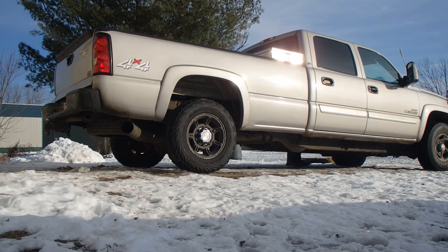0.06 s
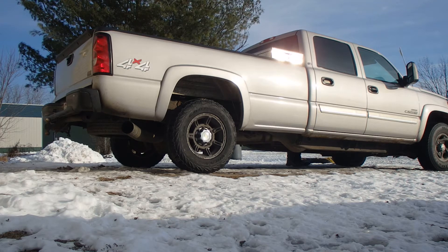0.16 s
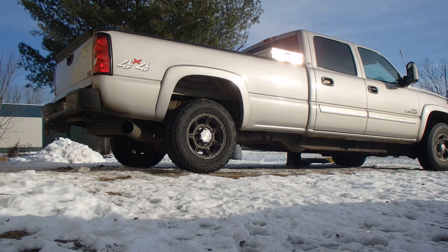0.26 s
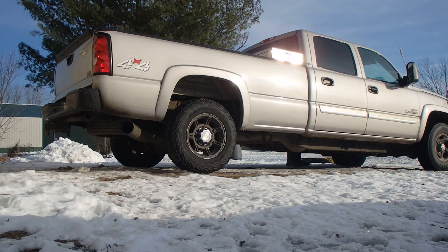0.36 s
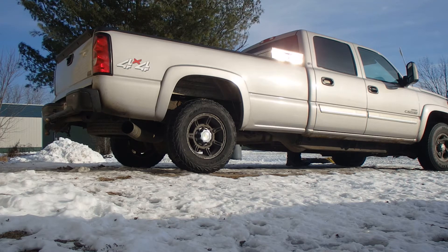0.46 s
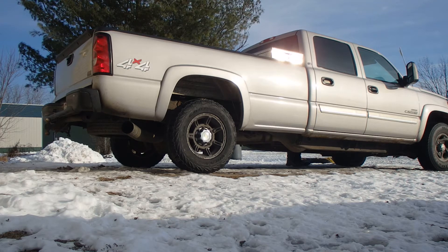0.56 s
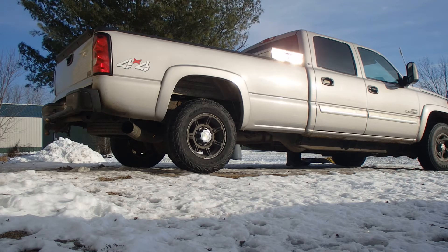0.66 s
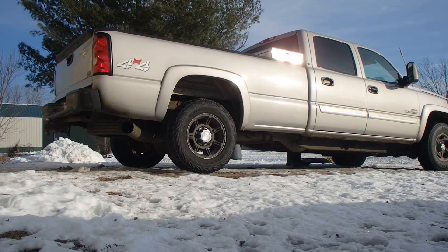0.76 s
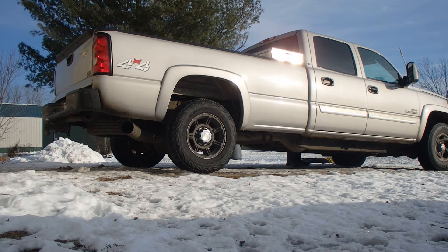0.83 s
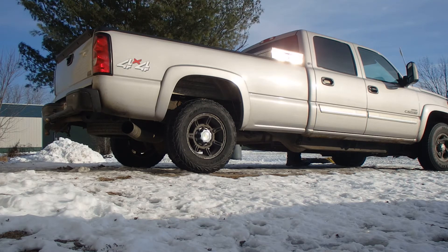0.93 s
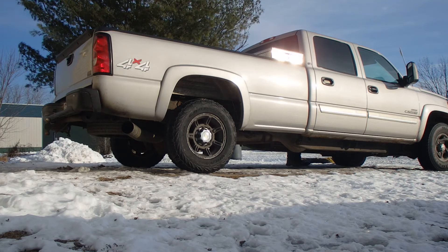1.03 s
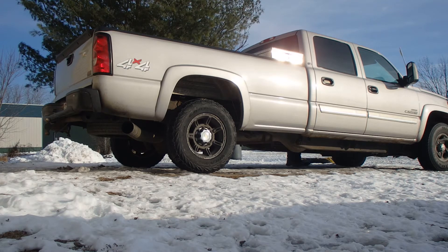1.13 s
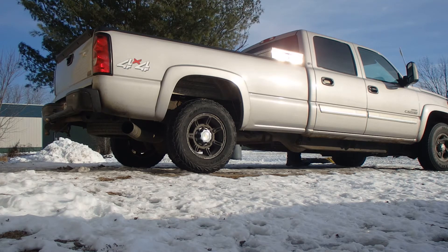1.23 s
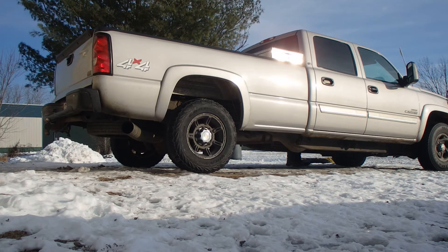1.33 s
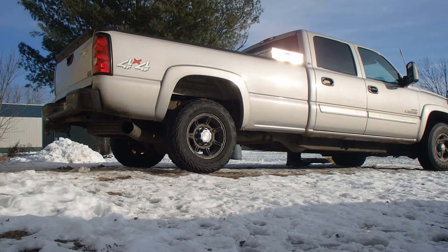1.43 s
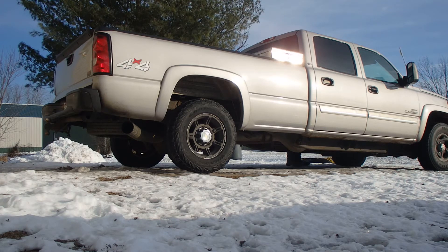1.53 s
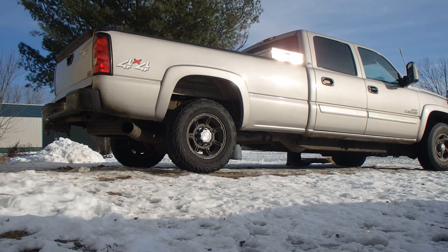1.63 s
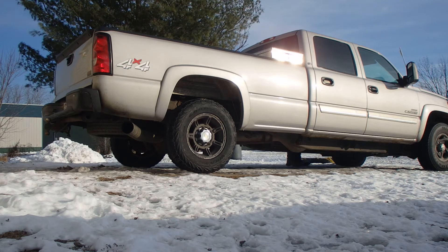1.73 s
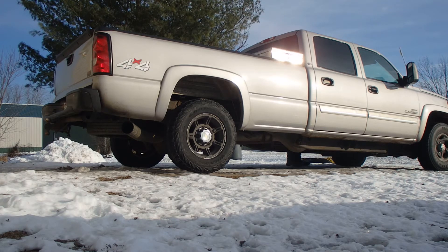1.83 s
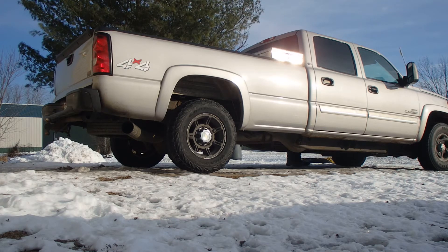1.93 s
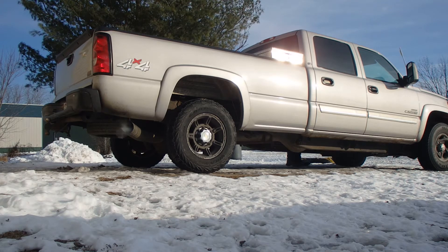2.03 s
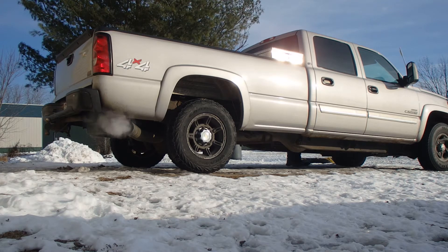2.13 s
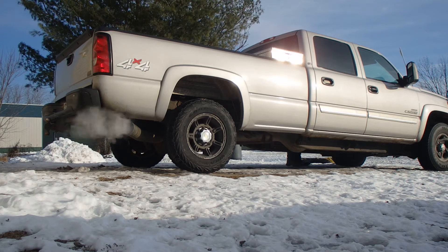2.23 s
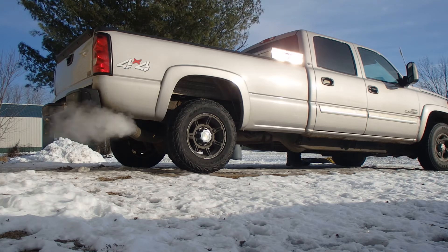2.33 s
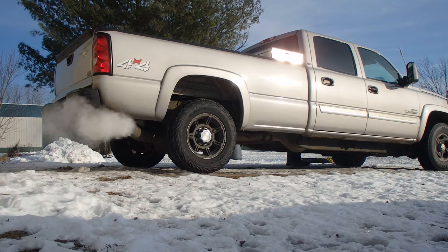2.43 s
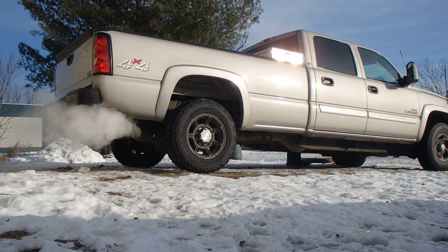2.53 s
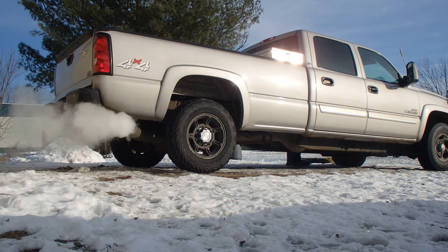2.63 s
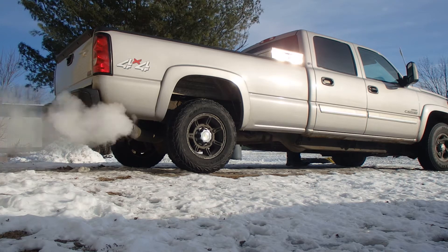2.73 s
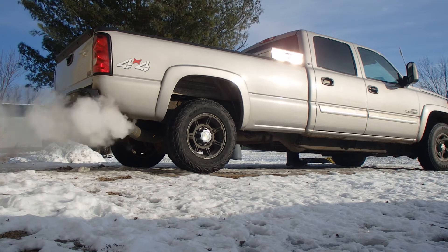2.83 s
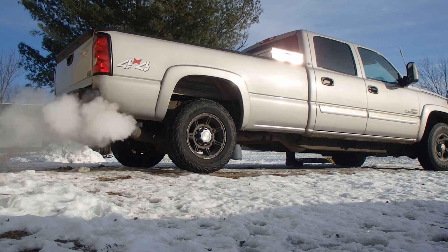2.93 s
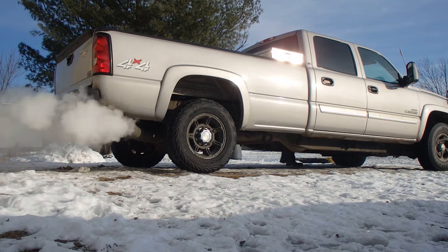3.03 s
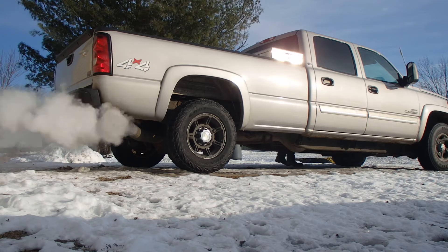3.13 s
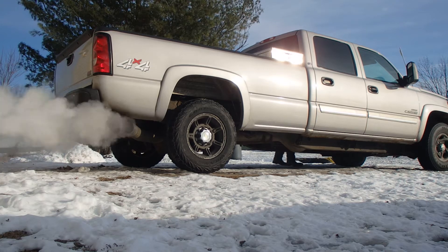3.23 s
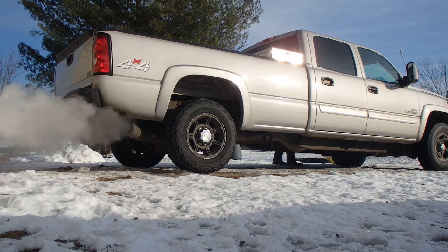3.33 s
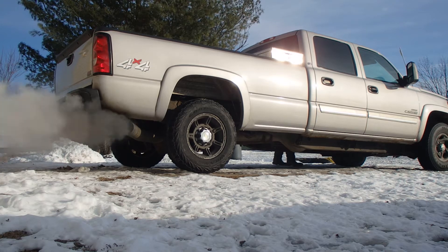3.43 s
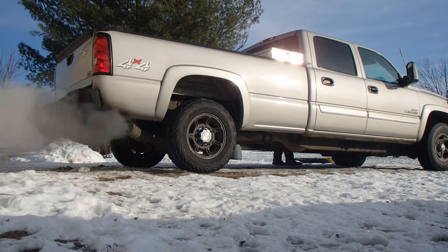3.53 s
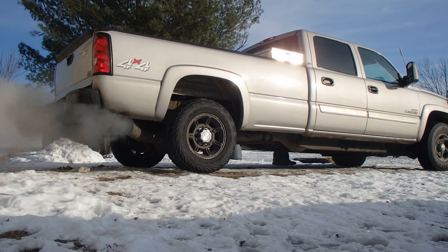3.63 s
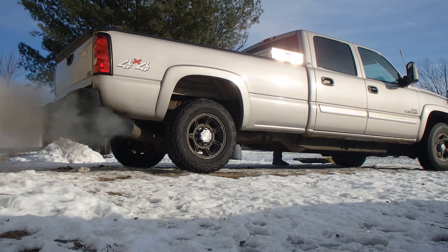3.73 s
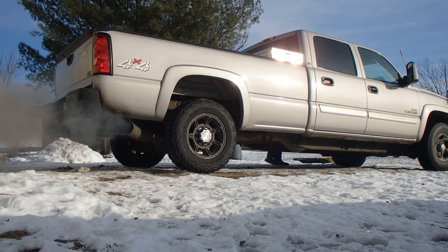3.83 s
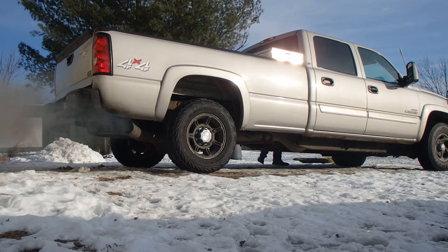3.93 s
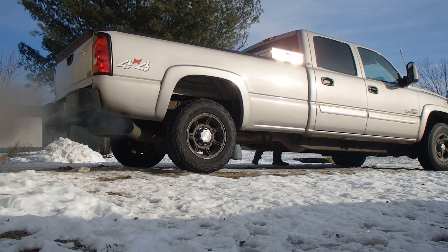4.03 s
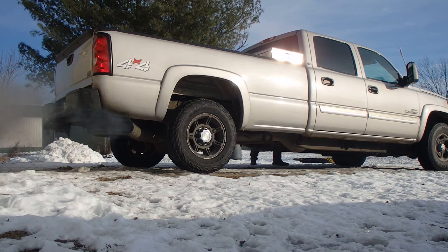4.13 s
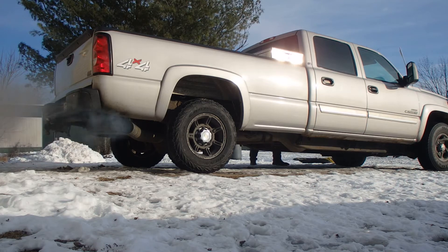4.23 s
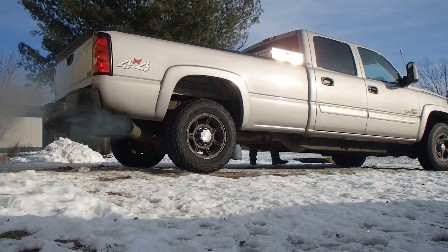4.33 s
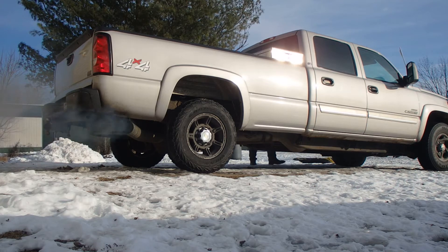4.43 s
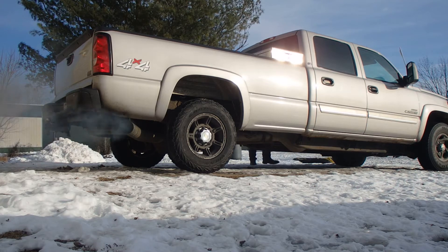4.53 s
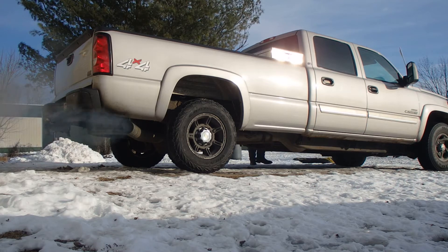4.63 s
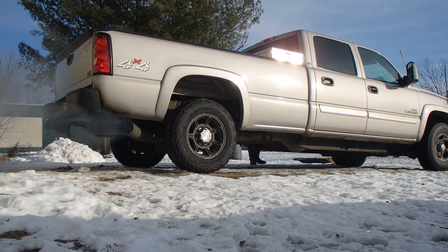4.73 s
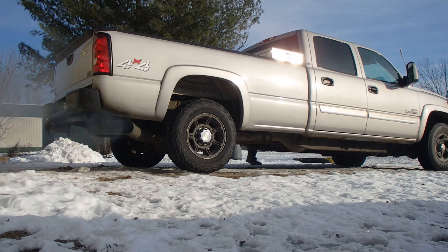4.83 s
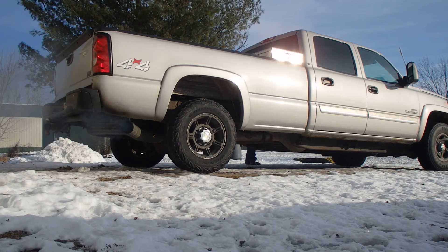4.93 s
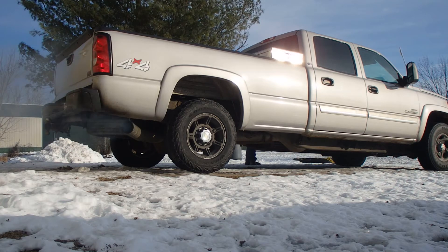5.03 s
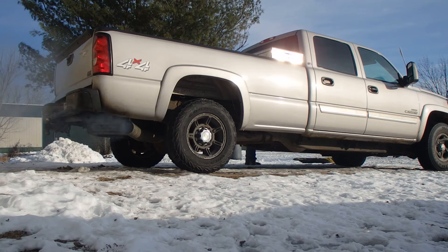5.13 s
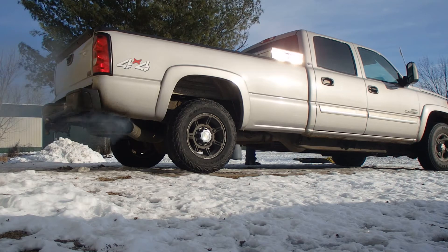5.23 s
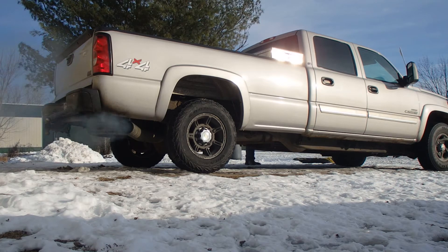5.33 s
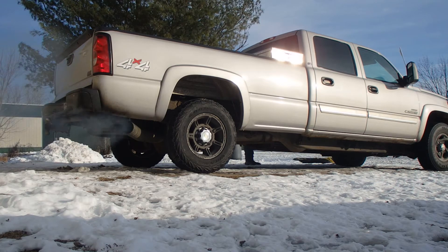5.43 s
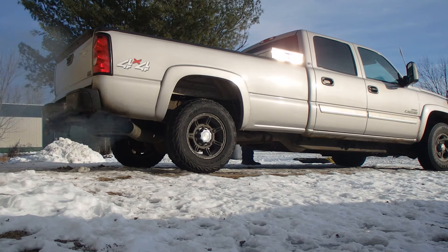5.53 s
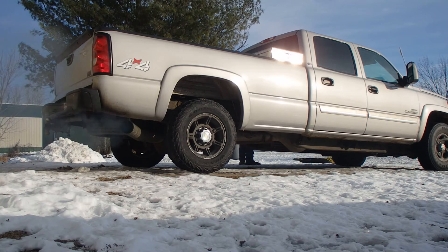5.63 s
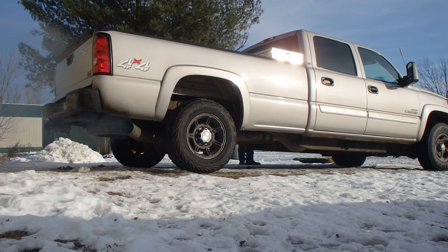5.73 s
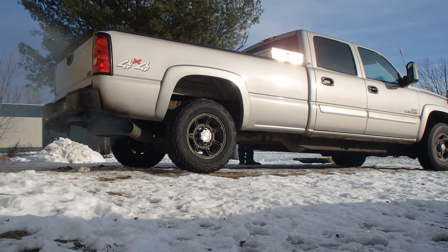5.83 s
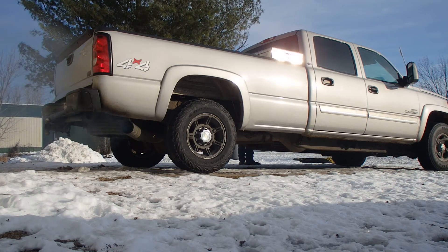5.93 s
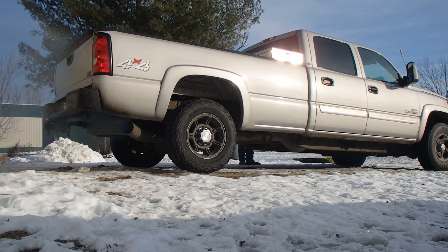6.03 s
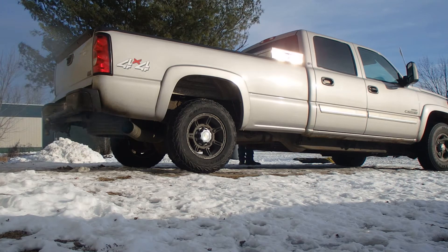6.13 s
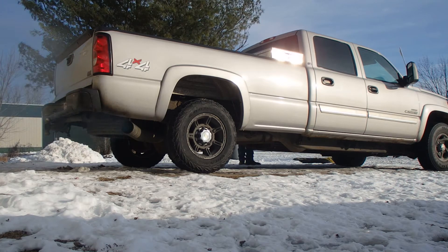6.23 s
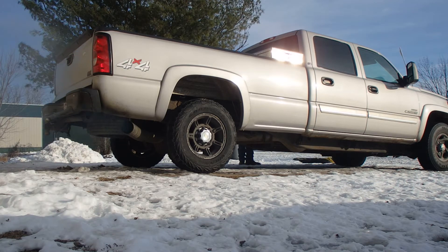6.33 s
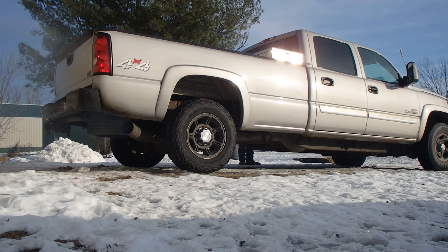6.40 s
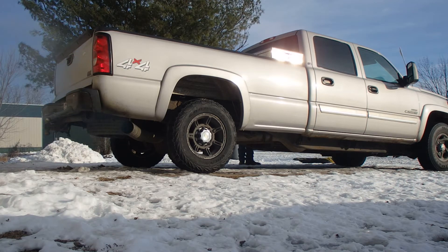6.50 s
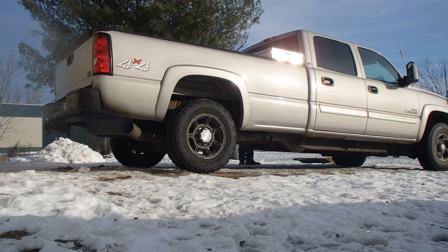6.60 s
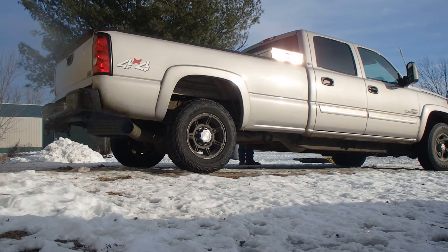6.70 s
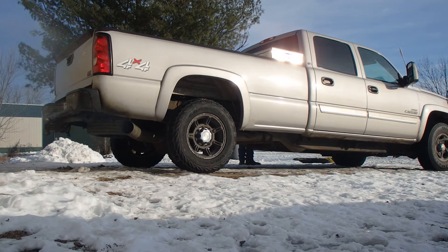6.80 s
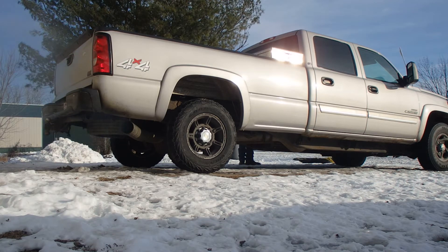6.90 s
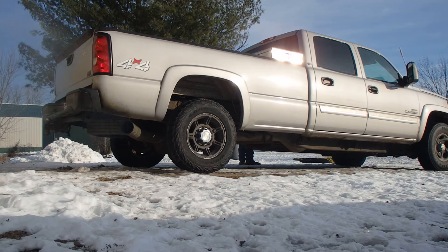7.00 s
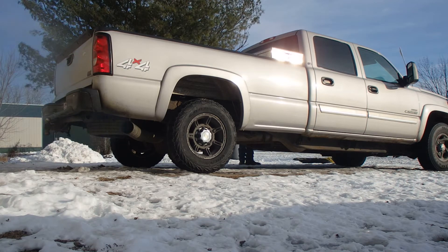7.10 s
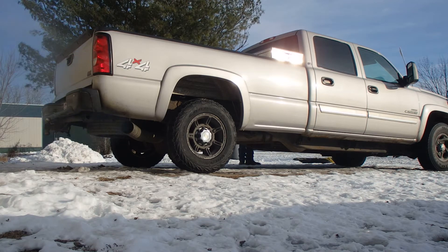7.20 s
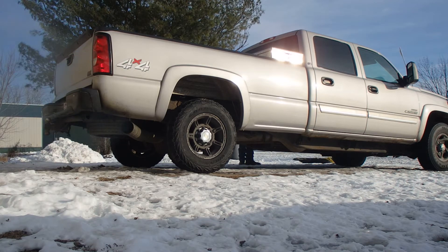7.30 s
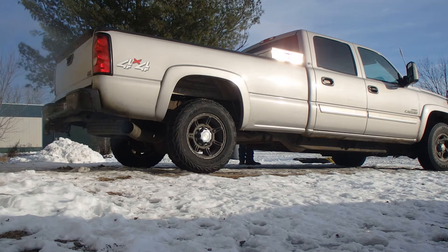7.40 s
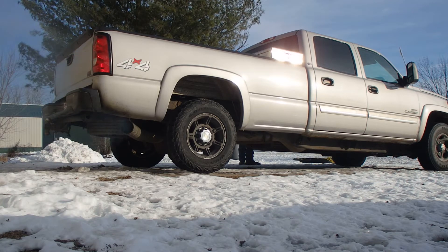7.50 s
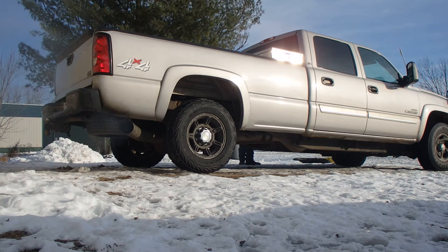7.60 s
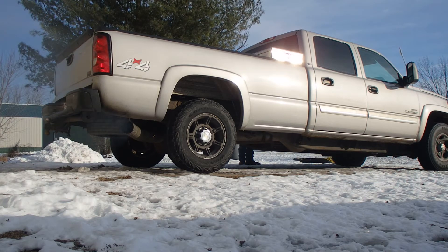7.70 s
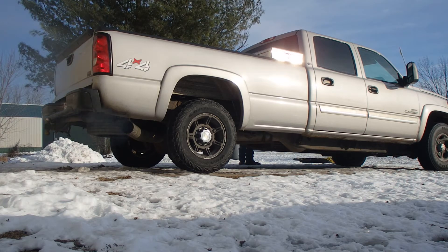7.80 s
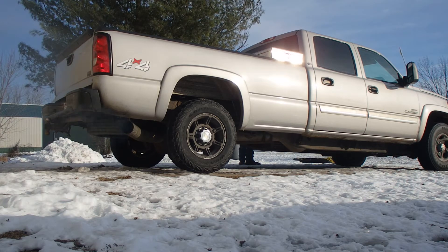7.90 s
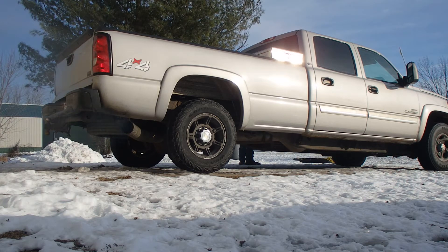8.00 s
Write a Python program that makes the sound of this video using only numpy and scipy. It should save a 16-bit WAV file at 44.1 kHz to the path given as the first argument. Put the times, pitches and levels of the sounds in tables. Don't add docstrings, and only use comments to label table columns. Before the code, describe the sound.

A quiet winter yard, a starter clunks and cranks in heavy straining pulses, then a big diesel stumbles alight and settles into loud, rattling idle.

```python
import sys
import numpy as np
from scipy import signal
from scipy.fft import rfft, irfft, next_fast_len
from scipy.io import wavfile

SR = 44100
rng = np.random.default_rng(int(sys.argv[2]) if len(sys.argv) > 2 else 0)


def volts(x):
    e = np.asarray(x, float) / 20
    return 10 ** e


def generate_wav(signal):
    frames = np.transpose(np.atleast_2d(signal))
    scaled = np.clip(frames, -1, 1) * 32767
    pcm = np.round(scaled).astype(np.int16)
    wavfile.write(sys.argv[1], SR, pcm)


N = 355446
TIME_S = np.arange(N) / SR

# size/1, extra path delay/ms
EXHAUST_PULSES = [(1.32, .3), (.67, 2), (1.03, .2), (.94, .4), (1.35, .2), (.3, 2.9), (1.44, .7),
                  (.66, 1.3)]
# f/Hz, width/Hz, signed gain/1
PIPE_MODES = [(51.3, 14, .3), (77, 14, .09), (110.6, 14, 1), (155.2, 14, -.36), (205, 14, -.12),
              (255, 16, .11), (334, 18, .09), (390, 30, -.08)]
COLD_PIPE_DB = [0, -16, -0.5, -13, -4.5, -22, -9, -26]
# f/Hz, level/dB
RASP_COLOUR = [(45, -23), (85, 4), (130, -5.5), (190, 0), (260, -13.5), (400, -9), (520, -22.5), (700, -23),
               (860, -36.5), (1200, -102)]
# t/s, extra firings per second/Hz
FLARE = [
    (2.2, -9),
    (2.3, .7),
    (2.4, 4.2),
    (2.5, -1.2),
    (2.6, 0),
]
# t/s, firings per second lost each second/Hz
SAG = [
    (4.375, .858),
    (5.15, 13.526),
]
# t/s, firings per second won back/Hz
FUEL_SHOTS = [
    (5.237, 6.197),
    (5.755, 7.183),
    (6.252, 6.801),
    (6.706, 7.179),
    (7.26, 7.401),
    (7.771, 7.816),
]
# t/s, lead over the mean/firings
CRANK_LEAD = [(2.4, 0), (2.47, -.06), (2.6, .04), (2.73, .14), (2.8, -.08), (2.98, .07), (3.05, -.13),
              (3.2, -.04), (3.26, -.2), (3.39, -.06), (3.45, -.18), (3.56, -.07), (3.64, -.15), (3.9, .07),
              (3.96, -.09), (4.05, .05), (4.1, -.08), (4.22, .03), (4.7, 0)]
# t/s, burn level/dB, gas flow level/dB
ENGINE_LOAD = [(1.94, -28, -9), (1.95, -18, -6), (2.07, -21, -3), (2.13, -29.5, -21.5), (2.3, -26.5, -8.5),
               (2.8, -24.5, -8.5), (3.15, -23.5, -7.5), (3.3, -20.5, -5.5), (3.52, -20.5, -6.5),
               (3.68, -21, -8), (4.2, -21, -8), (4.6, -17, -7), (5.15, -20.5, -12), (5.45, -19, -10.5),
               (5.8, -19.5, -12), (6.6, -20, -12), (6.9, -18, -10), (8.06, -19, -10.5)]
# t/s, length/s, knock lost/dB, throb lost/dB
MISSES = [(2.036, 0.019, 5.5, 12), (2.204, 0.015, 21, 8), (2.252, 0.07, 1.5, 4), (2.408, 0.089, 8, 10),
          (2.61, 0.03, 1.5, 2), (2.749, 0.067, 7, 5.5), (2.95, 0.064, 5, 4.5), (3.035, 0.034, 7, 4),
          (3.208, 0.091, 9, 9.5), (3.383, 0.11, 8, 7.5), (3.581, 0.095, 9, 9), (3.752, 0.096, 5, 6.5),
          (3.905, 0.041, 6, 7.5), (4.052, 0.063, 8.5, 8), (4.204, 0.058, 5, 4), (4.322, 0.11, 4, 5),
          (4.479, 0.069, 4.5, 3.5), (4.634, 0.06, 3.5, 2.5), (4.772, 0.023, 2, 1), (5.98, 0.056, 2.5, 1.5),
          (6.294, 0.018, 2.5, 6), (6.663, 0.017, -0.5, -4.5), (7.094, 0.081, 2, 0)]
# t/s, level against the burn/dB
TURBINE = [
    (1.94, -30),
    (2.1, -31),
    (2.2, -23),
    (2.3, -35),
    (2.6, -38.5),
    (3.3, -17.5),
    (3.55, -19),
    (3.9, -21),
    (4.6, -25.5),
    (8.1, -24),
]
# knock level/dB, lateness/ms
BURNS = [(.3, 0), (.5, 0), (0, 0), (.2, .3), (.8, .3), (-1.4, 1), (-2.6, 1.6), (1.4, 0)]
# f/Hz, level/dB
BLOCK_COLOURS = [
    [(300, -4.5), (2100, 5.5), (2500, -20.5)],
    [(1900, -29), (2300, 3.5), (3000, 0), (3300, -9)],
    [(2800, -26), (3200, 2), (5500, -5.5), (7500, -7.5)],
]
# level/dB, steady share/1, delay/ms, rise/ms
BLOCK_ANSWERS = [
    (-3.5, 0.57, -1.6, 6.6),
    (-6, 0.28, -1.06, 5.24),
    (-4, 0.35, 0.68, 8.1),
]
# f/Hz, level/dB
VALVE_COLOUR = [(450, -27), (600, 4.5), (900, 7), (1300, 5.5), (1700, -11), (2400, -49)]
# f/Hz, level/dB
HISS_COLOUR = [(4000, -18), (5500, -12.5), (7000, -4.5), (11500, -2), (13500, -7.5)]

# t/s, peak level/dB, thump over it/dB
HEAVY_KNOCKS = [(3.06, -11, -30), (3.0953, -21, -30), (3.5057, -7, -30), (3.812, -5, -30),
                (3.8706, -13, -30), (3.9476, -6, -30), (4.06, -9, -30), (4.336, -17, -30),
                (4.3725, -8, -30), (4.5096, -20, -30), (4.547, -7, -30), (4.666, -6.5, -30),
                (4.8034, -5, -30), (5.0568, -12, -30), (5.118, -7, -30), (5.1357, -22, -32),
                (5.215, -9, -30), (5.2564, -14, -30), (5.2733, -18, -30), (5.295, -6, -30),
                (5.5435, -4, -30), (5.5806, -10, -30), (5.6011, -15, -30), (5.64, -17, -30),
                (5.662, -21, -30), (5.7438, -12, -30), (5.8421, -9, -30), (5.8818, -3, -30),
                (5.9363, -9, -30), (6.192, -6, -30), (6.2103, -1.5, -30), (6.2526, -7, -30),
                (6.3334, -6, -30), (6.369, -3, -30), (6.3923, -16, -30), (6.4673, -7.5, -30),
                (6.523, -5.5, -30), (6.5674, -10, -30), (6.7036, -8, -30), (6.7833, -4, -30),
                (6.8408, -13, -30), (6.902, -1.5, -30), (6.9904, -26, -30), (7.1355, -10, -30),
                (7.3332, -2, -30), (7.3746, -11, -30), (7.412, -15, -30), (7.508, -9, -30),
                (7.625, -14, -30), (7.7462, -7, -30), (7.7896, -14, -30), (7.809, -6, -30),
                (7.8899, -13, -30), (7.9657, -23, -30), (7.9827, -14, -30), (8.0041, -16, -30)]
# t/s, peak level/dB, thump over it/dB
COLD_KNOCKS = [(2.225, -30, -30), (2.2861, -11, -30), (2.324, -24, -30), (2.3464, -24, -30),
               (2.3828, -19, -30), (2.4133, -26, -30), (2.533, -10, -30), (2.7241, -17.5, -30),
               (2.7839, -18, -30), (2.8245, -9, -30), (2.8792, -14, -30), (2.9356, -19, -30),
               (2.956, -16, -30), (2.9755, -5, -30), (3.0373, -19, -28), (3.1376, -15, -30),
               (3.173, -8.5, -30), (3.2139, -18, -30), (3.251, -21, -30), (3.2718, -11, -30),
               (3.2898, -4.5, -30), (3.3127, -6, -30), (3.403, -16, -30), (3.4415, -4, -30),
               (3.4654, -5, -30), (3.5254, -7, -30), (3.5801, -11, -30), (3.6041, -4, -30)]
# t/s, knock peak level/dB, thump over it/dB
FIRST_FIRINGS = [(1.8284, -32, 15), (1.847, -19, 6), (1.863, -26, 4), (1.8796, -6.5, -8), (1.888, -15, 12),
                 (1.9144, -3.5, 5), (1.923, -10, -3), (1.9294, -19, 21), (1.952, -4, -6),
                 (1.9745, -9.5, 11.5), (1.9944, -6.5, -7), (2.0146, -25, -9), (2.0348, -8.5, 6),
                 (2.0553, -13, 9), (2.0744, -15.5, 9), (2.1075, -32, 24), (2.1332, -37, 22),
                 (2.1656, -21, -11)]
# f/Hz, level/dB
HEAVY_COLOUR = [(500, 8), (3800, 5.0), (4500, -11), (9000, -14)]
COLD_COLOUR = [(500, 9), (2300, -10), (3700, 7), (4500, -3), (9000, -12)]
# f/Hz, level/dB
FIRING_COLOUR = [(400, 14.5), (1300, 17.5), (2000, 7), (3000, 2), (6000, -3), (10000, -14)]
# f/Hz, width/Hz, signed gain/1
THUMP_MODES = [(53, 22, 0.81), (109, 19, -1.1), (159, 22, 0.13), (357, 54, -0.28), (634, 63, -0.059)]
# f/Hz, width/Hz, signed gain/1
WALL_MODES = [(1840, 200, 0.8), (2680, 100, 1.65), (3400, 410, -0.84)]
# t/s, level/dB, rise/s
HOUSING_STRIKES = [
    (.558, -18, 0.01),
    (.715, -16, 0.017),
    (.958, -24, 0.0074),
]

# t/s, peak level/dB, thud over it/dB
PINION_CLUNKS = [(0.556, -7.5, -1), (0.5616, -3, -14), (0.5706, -2, -23), (0.5774, -0.5, -8),
                 (0.5852, -4, -12), (0.5964, -28, -4), (0.6055, -12.5, 9.5), (0.625, -17, 10),
                 (0.7339, -9, -17), (0.8194, -10, 7.5), (0.9636, -4, -22)]
# f/Hz, level/dB
CLUNK_COLOUR = [(400, -8), (800, 4), (1300, 20), (1900, -1), (2750, 3), (3200, 0), (3750, 8), (5500, 1),
                (7300, 13.5), (10000, 4)]
# f/Hz, width/Hz, signed gain/1
THUD_MODES = [(124, 26, 0.56), (242, 27, -0.93), (430, 43, 0.51), (760, 70, -0.0043)]
# t/s, level/dB
STARTER_EFFORT = [
    (.54, -50),
    (.566, -20),
    (.614, -9),
    (.74, -15.5),
    (.83, -16),
    (1.04, -15),
    (1.75, -14.5),
    (1.925, -23.5),
    (1.94, -37),
]
# t/s, pumped air over effort/dB, whine over effort/dB
STROKES = [
    (0.397, -14, 23),
    (0.599, -17, -14),
    (0.798, -12.5, -15.5),
    (1.001, -9.5, -11),
    (1.166, -14, -17),
    (1.311, -19.5, -13.5),
    (1.457, -13.5, -17),
    (1.593, -11.5, -18),
    (1.737, -18, -20),
    (1.94, 15, -34),
]
# gear song level/dB, then brush whine level/dB
TEETH_DB = [-9, -5, -7, -3, -6.5, -4, -12, -4, -6.5, -9]
BRUSH_DB = [0, 7, -3.5, -5, -3.5, -4.5, -5, 0, 2.5, -3]
# multiple of the pitch/1, level/dB
BRUSH_TONES = [(1, -0.5), (2, -20)]
MESH_TONES = [(1, -2), (1.5, -8), (2, 4), (2.5, -8), (3, 1), (3.5, -8), (4, -8)]
# t/s, f/Hz, level/dB
OVERRUN = [
    (1.76, 3360, -46),
    (1.78, 3350, -26),
    (1.8, 3380, -33),
    (1.83, 3450, -36),
    (1.85, 3870, -25),
    (1.868, 4010, -27.5),
    (1.9, 4030, -23),
    (1.918, 3630, -23),
    (1.93, 3700, -57),
]
# f/Hz, level/dB
AIR_COLOUR = [(15, -25), (30, -1.5), (70, -9.5), (114, -6.5), (173, -12), (224, -15), (300, -22),
              (390, -21), (660, -120)]
# f/Hz, level/dB
GRIND_COLOUR = [(200, -80), (700, 16), (1200, 17), (2500, -4), (4500, 1.5), (5500, -6), (7500, -1),
                (8300, 2.5), (8900, -7), (9500, -2), (10200, -9), (15000, -30)]
# f/Hz, level/dB
GROWL_COLOUR = [(120, -38), (220, 6.0), (450, 7.0), (700, -4.0), (850, -59), (2000, -110)]
SHUDDER_COLOUR = [(560, -32), (660, 1.0), (740, 4), (840, -47), (2000, -110)]
SQUEAL_FLUTTER = [(1, -10), (300, -4), (700, -30)]
WHIRR_COLOUR = [(3500, -8.5), (4500, 6), (6500, -5), (9500, 3.0), (12000, -30)]
# f/Hz, width/Hz, gain/1
GEARCASE_MODES = [(4610, 50, 0.94), (5030, 45, 0.97), (5930, 68, 0.72), (6300, 130, 0.75), (7100, 130, .8),
                  (7470, 130, 0.86), (8370, 210, 0.79), (9360, 200, 0.72)]

# f/Hz, width/Hz, signed gain/1
PANEL_MODES = [(680, 17, 10), (815, 34, 8.9), (944, 40, 14.7), (1016, 79, 11.9), (1141, 45, 8.5),
               (1258, 89, 4.9), (1432, 63, 4.95), (1521, 21, 5.8), (1672, 7.7, 5.8), (1887, 17.5, 4.2),
               (2784, 28, 1)]
# f/Hz, level/dB
PORT_LEFT = [(500, -29), (860, -52.5), (1250, -39), (1950, -20.5), (2330, -14), (2780, -5), (3000, -18),
             (3650, -5), (4000, -18), (4760, -24), (5170, -14), (6800, -27.5), (9800, -30), (16000, -62)]
PORT_RIGHT = [(500, -32), (860, -53), (1250, -36), (1950, -22), (2330, -16), (2780, -6), (3000, -20.5),
              (3650, -9), (4000, -19), (4760, -22.5), (5170, -33.5), (6800, -43), (9800, -54), (16000, -71)]
# t/s, peak level/dB, left over right/dB
OVERLOADS = [(1.9582, -41, 1), (1.9971, -47, 2), (2.0585, -34, 2), (2.3473, -55, 0.5), (2.6441, -35, 2.5),
             (2.8971, -39, 3), (3.1126, -49, 3), (3.2732, -51, 5.0), (3.2912, -38, 0), (3.4488, -50, 6.5),
             (3.6444, -56, 5.5), (3.6823, -48, 7.5), (3.7975, -51, 10), (3.9108, -54, 9),
             (3.9532, -50, 5.5), (3.9706, -40, 3), (4.0659, -53, 4.0), (4.6496, -45, 5.0),
             (4.668, -49, 4.0), (4.7469, -33, 4), (4.8067, -42, 4), (4.9634, -37, 0.5), (5.1185, -37, 4.5),
             (5.2767, -40, 5), (5.3919, -37, 7.5), (5.584, -38, 4.0), (5.7436, -46, 6.5),
             (5.8439, -38, 8.5), (6.1342, -51, 5.0), (6.2145, -42, 6.0), (6.2529, -44, 7.0),
             (6.2963, -48, -0.5), (6.3712, -35, 8.0), (6.5253, -50, 5.5), (6.7279, -38, 7.5),
             (6.7872, -37, 6.5), (6.865, -43, 7.0), (7.1544, -42, 4.0), (7.317, -41, 3.5), (7.4143, -30, 6),
             (7.5505, -48, 7.0), (7.6293, -48, 6.0), (7.7091, -36, 3), (7.8309, -44, 7.0), (7.8907, -39, 8)]
# f/Hz, level/dB
YARD_COLOUR = [(15, -29), (25, -1.5), (141, 5), (405, -12), (677, -17), (754, -17.5), (1160, -21),
               (1440, -23), (7920, -27), (14400, -25), (16000, -32)]
# f/Hz, likeness/1
YARD_ALIKE = [(60, 0.87), (180, 1), (550, 0.87), (1650, 0.34), (4970, 0.12), (15000, -0.1)]
# t/s, yard level/dB, fuel pump level/dB
QUIET_LEVELS = [
    (0, -40, -90),
    (.35, -40, -90),
    (.37, -40, -65),
    (.55, -40, -68),
    (.6, -40, -90),
    (1.93, -37.5, -92),
    (1.96, -57, -92),
    (8.06, -45, -89),
]
# f/Hz, level/dB
PUMP_COLOUR = [(900, -29.0), (1350, 17.0), (2000, -22), (3700, 2), (4500, -39)]

FUEL_SHOT_S = .15


def unit(x):
    return x / np.sqrt(np.mean(x ** 2) + 1e-20)


def glide(times, values):
    return np.interp(TIME_S, times, values)


def along(points, hz):
    f, v = np.transpose(points)
    return np.interp(np.log(hz + 1), np.log(f + 1), v)


def curves(rows, silent_db=-120):
    s, *columns = np.transpose(rows)
    return [np.interp(TIME_S, s, column, silent_db, silent_db) for column in columns]


def filtered(x, response):
    m = next_fast_len(N + SR // 2)
    return irfft(rfft(x, m) * response(np.fft.rfftfreq(m, 1 / SR)), m)[..., :N]


def noise(colour):
    return unit(filtered(rng.standard_normal(N), lambda hz: volts(along(colour, hz))))


def resonances(modes):
    return lambda f: sum(gain * 1j * f * w / (c * c - f * f + 1j * f * w) for c, w, gain in modes)


def muffled(modes, top_hz):
    return lambda hz: resonances(modes)(hz) / (1 + (hz / top_hz) ** 6)


def spikes(times, sizes):
    at = np.round(np.asarray(times) * SR).astype(int)
    keep = (at >= 0) & (at < N)
    return np.bincount(at[keep], np.asarray(sizes)[keep], N)


def bursts(times, sizes, rise_s):
    u = np.arange(SR // 10) / SR / rise_s
    return signal.fftconvolve(spikes(times, sizes), (u * np.exp(1 - u)) ** 2)[:N]


def swells(times, lengths, sizes):
    t = np.arange(0, N + 64, 64) / SR
    bell = np.exp(-2 * ((t - np.c_[times]) / np.c_[lengths]) ** 2)
    return np.interp(TIME_S, t, np.asarray(sizes) @ bell)


def tones(pitch_hz, multiples, rough=0.18, rough_hz=40):
    phase = 2 * np.pi * np.cumsum(pitch_hz) / SR
    shake = noise([(1, 0), (rough_hz, -3), (3 * rough_hz, -40)])
    total = 0
    for i, (multiple, db) in enumerate(multiples):
        loudness = volts(db) * (1 + rough * np.roll(shake, 5000 * i))
        wobble = rough * np.roll(shake, 3000 + 5000 * i)
        total = total + loudness * np.sin(multiple * phase + wobble)
    return total / np.sqrt(1 + rough ** 2)


def idle():
    throb_db, rasp_db, knock_db, hiss_db = engine_levels()
    beat = firing_times()
    luck = rng.standard_normal((len(beat), 2))
    size, late_ms = np.resize(np.roll(EXHAUST_PULSES, 1, axis=0), (len(beat), 2)).T
    valve = beat + late_ms / 1000 + 0.00023 * luck[:, 1]
    size = size * volts(0.23 * luck[:, 0])

    cold_modes = [(hz, width, gain * volts(db)) for (hz, width, gain), db in zip(PIPE_MODES, COLD_PIPE_DB)]
    warm = glide((3.9, 3.1), (0, 1))
    pulses = spikes(valve, size)
    throb = (1 - warm) * filtered(pulses, muffled(cold_modes, top_hz=352))
    throb = throb + warm * filtered(pulses, muffled(PIPE_MODES, top_hz=352))
    puff = 37.0 + bursts(valve, size, rise_s=0.00088)
    weak_flow_db = glide([2.09, 2.11], [3.5, 0])
    rasp = volts(rasp_db + 5.0 - weak_flow_db) * unit(puff * noise(RASP_COLOUR))
    pipe = volts(throb_db - 2.24) * unit(throb) + rasp

    knock = 0
    for (db, steady, delay_ms, rise_ms), colour in zip(BLOCK_ANSWERS, BLOCK_COLOURS):
        knock = knock + volts(db) * knocking(beat, colour, steady, delay_ms, rise_ms)
    tappets = knocking(beat, VALVE_COLOUR, steady=0.89, late_ms=-2.0)
    hiss = knocking(beat, HISS_COLOUR, steady=0.92, late_ms=3.9)
    bay = volts(knock_db + 11.5) * knock + volts(.5 * rasp_db - 2.5) * tappets + volts(hiss_db + 38.0) * hiss
    return pipe, bay


def firing_times():
    t = np.arange(round(2.2 * SR), N) / SR
    rate_hz = 51.585 + np.interp(t, *np.transpose(FLARE))
    rate_hz = rate_hz - sum(loss * np.clip(t - s, 0, None) for s, loss in SAG)
    rate_hz = rate_hz + sum(gain * np.clip((t - s) / FUEL_SHOT_S, 0, 1) for s, gain in FUEL_SHOTS)
    turned = np.cumsum(rate_hz) / SR + np.interp(t, *np.transpose(CRANK_LEAD))
    return np.interp(np.arange(-1, int(turned[-1])), turned, t)


def engine_levels():
    burn_db, gas_db = curves(ENGINE_LOAD)
    s, length, knock_lost, throb_lost = np.transpose(MISSES)
    missed_db = swells(s, length, knock_lost)
    shots = np.transpose(FUEL_SHOTS)[0]
    ones = np.ones(len(shots))

    def shot(late_s):
        return swells(shots + late_s, FUEL_SHOT_S / 2 * ones, ones)

    fuel_db = burn_db + 2.5 * shot(late_s=0.11)
    throb_db = gas_db - swells(s, length, throb_lost) + 0.5 * shot(late_s=0.16)
    weak_burn_db = np.clip(-17.5 - burn_db, 0, 9)
    rasp_db = gas_db - 14 + 0.34 * weak_burn_db - 0.91 * missed_db
    hiss_db = fuel_db + curves(TURBINE)[0] - 1.15 * missed_db
    return throb_db, rasp_db, fuel_db - missed_db, hiss_db


def knocking(beat, colour, steady, late_ms=1, rise_ms=5):
    luck = rng.standard_normal((len(beat), 2))
    burn_db, slow_ms = np.resize(BURNS, (len(beat), 2)).T
    at = beat + (late_ms + slow_ms - 2 + .5 * luck[:, 0]) / 1000
    swell = bursts(at, volts(burn_db + 1.2 * luck[:, 1]), rise_ms / 1000)
    return unit((steady + abs(swell) ** 1.5) * noise(colour))


def blows(events, colour, late_s, rise_s, boost_db, thump_db, body=THUMP_MODES):
    s, db, thump_over_db = np.transpose(events)
    crack = bursts(s + late_s, volts(db + boost_db), rise_s) * noise(colour)
    thump = filtered(spikes(s, volts(db + thump_over_db + thump_db)), muffled(body, top_hz=820))
    return thump, crack


def ringing():
    s, db, _ = np.transpose(HEAVY_KNOCKS)
    sing = sum(bursts([at], [volts(level_db)], rise_s) for at, level_db, rise_s in HOUSING_STRIKES)
    strikes = bursts(s, volts(db + 6.5), rise_s=0.0021) * rng.standard_normal(N)
    wall = filtered(strikes, resonances(WALL_MODES))
    return np.zeros(N), wall + sing * np.sin(2 * np.pi * 2770 * TIME_S)


def stroke_turn():
    return 2 * np.pi * glide(np.transpose(STROKES)[0], np.arange(len(STROKES)))


def starter():
    effort_db, = curves(STARTER_EFFORT)
    tops = np.transpose(STROKES)[0]
    air_over_db, whine_over_db = curves(STROKES)
    turn = stroke_turn()
    air_db = effort_db + air_over_db - 3 * np.cos(turn - .5)
    whine_db = effort_db + whine_over_db + 3 * np.cos(turn + 0.082)
    strain = np.cos(turn + 1.0)
    steady = glide([.62, .67, .8, .84, 1.02, 1.1, 1.76, 1.8], [0, .9, .8, .35, .4, 1, 1.5, 0])
    swing_hz = glide([.7, .8, 1], [0, 70, 115])
    spin_hz = 290 + swing_hz * (1 - np.cos(turn)) + .6 * (115 - swing_hz)

    hum = volts(-4 - 9 * np.cos(turn)) * tones(spin_hz, [(.5, 0)])
    brush_db = 2.5 + 4 * strain + glide(tops, BRUSH_DB)
    whine = volts(brush_db) * tones(spin_hz, BRUSH_TONES, rough=.22, rough_hz=35)
    brush = steady * volts(whine_db) * (hum + whine)
    mesh_db = effort_db - 10.5 + glide(tops, TEETH_DB) + 11 * np.cos(turn + 1.3)
    mesh = steady * volts(mesh_db) * tones(1020 - 170 * np.cos(turn), MESH_TONES, rough=.33, rough_hz=70)
    grind = volts(effort_db + 10 + 4 * np.cos(turn + 1.3)) * noise(GRIND_COLOUR)
    growl = volts(whine_db - 4.0 + 0.81 * strain) * noise(GROWL_COLOUR)
    shudder = steady * volts(whine_db - 11.5 + 10.4 * np.cos(turn)) * noise(SHUDDER_COLOUR)
    air = volts(air_db + 5.8 * np.cos(turn - .8)) * noise(AIR_COLOUR)

    overrun_hz, overrun_db = curves(OVERRUN)
    squeal = volts(overrun_db + 13) * tones(overrun_hz, [(0.98, 0)]) * noise(SQUEAL_FLUTTER)
    whirr = volts(overrun_db + 18) * noise(WHIRR_COLOUR)
    return brush + growl + shudder + air, grind + mesh + squeal + whirr


def gearcase():
    grains = rng.standard_normal(N) * rng.exponential(1, N) ** 1.5
    ring = unit(filtered(grains, muffled(GEARCASE_MODES, top_hz=9800)))
    ring_db = curves(STARTER_EFFORT)[0] - 4 + 7 * np.cos(stroke_turn() + 1.7)
    return np.zeros(N), volts(ring_db) * ring


def ports(bay):
    bay = bay + filtered(bay, resonances(PANEL_MODES))
    bay = filtered(bay, lambda hz: volts(-11.5 * np.exp(-((hz - 4713) / 170) ** 2)))
    echoes = rng.standard_normal(SR // 40) * np.hanning(SR // 40)
    scatter = signal.fftconvolve(bay, echoes / np.linalg.norm(echoes))[:N]

    def right(hz):
        return volts(along([(250, -70)] + PORT_RIGHT, hz)) * np.exp(-2j * np.pi * hz * 3.5e-5)

    def blur(hz):
        return right(hz) * np.clip(hz / 7000, 0, 1) ** 2.15 * 1.3

    left = filtered(bay, lambda hz: volts(along([(250, -24)] + PORT_LEFT, hz)))
    return np.array([left, filtered(bay, right) + filtered(scatter, blur)])


def overloads():
    s, db, pan_db = np.transpose(OVERLOADS)
    crests = rng.standard_normal(90) * np.hanning(90) / 6
    sides = []
    for side in (1, -1):
        hits = spikes(s + .0004, volts(db + 16 + side * pan_db / 2))
        sides.append(np.gradient(np.convolve(hits, crests)[:N]))
    return np.array(sides)


def fuel_pump():
    return volts(curves(QUIET_LEVELS)[1] + 25.5) * noise(PUMP_COLOUR)


def yard():
    def middle_and_side(hz):
        angle = np.arccos(np.clip(along(YARD_ALIKE, hz), -1, 1)) / 2
        return volts(along(YARD_COLOUR, hz)) * np.array([np.cos(angle), np.sin(angle)])

    mid, side = filtered(rng.standard_normal((2, N)), middle_and_side)
    drone = volts(-19) * np.sin(2 * np.pi * 747 * TIME_S)
    return volts(curves(QUIET_LEVELS)[0]) * (unit(np.array([mid + side, mid - side])) + drone)


def scene():
    parts = [
        idle(),
        blows(HEAVY_KNOCKS, HEAVY_COLOUR, late_s=-0.0012, rise_s=0.0047, boost_db=-1.5, thump_db=33),
        blows(COLD_KNOCKS, COLD_COLOUR, late_s=-0.00046, rise_s=0.0032, boost_db=-1, thump_db=33),
        blows(FIRST_FIRINGS, FIRING_COLOUR, late_s=.001, rise_s=.005, boost_db=8, thump_db=46),
        ringing(),
        starter(),
        blows(PINION_CLUNKS, CLUNK_COLOUR, late_s=-0.00058, rise_s=0.0049, boost_db=4.0, thump_db=38,
              body=THUD_MODES),
        gearcase()]
    low, bay = np.sum(parts, axis=0)

    def lean(hz):
        return np.exp(np.outer([-1, 1], 0.062 * np.clip(1.2 - hz / 300, 0, 2) - .04j))

    return filtered(low, lean) + ports(bay + fuel_pump()) + yard()


def band_limit(x):
    return signal.sosfilt(signal.butter(12, 16190, fs=SR, output="sos"), x)


def record(dry):
    thin = filtered(dry, lambda hz: 1 / (1 + (29 / (hz + 1)) ** 4))
    held = thin / (1 + abs(thin) ** 14) ** (1 / 14)
    return band_limit(held + overloads())


dry = scene()
out = record(dry)
generate_wav(out)
```